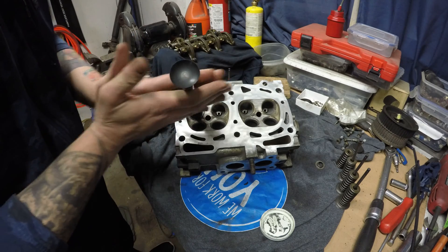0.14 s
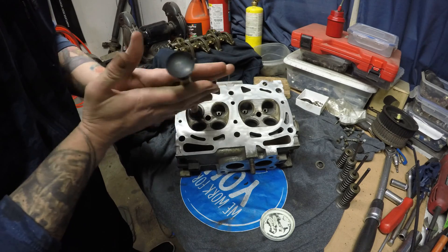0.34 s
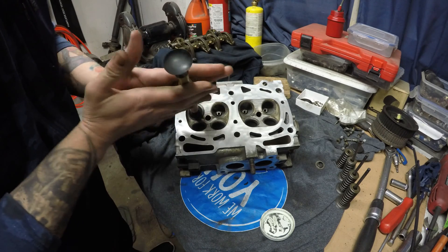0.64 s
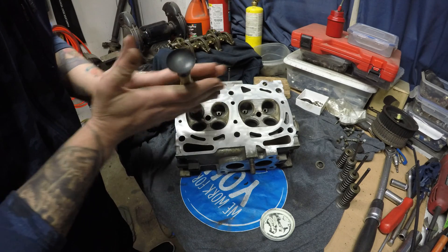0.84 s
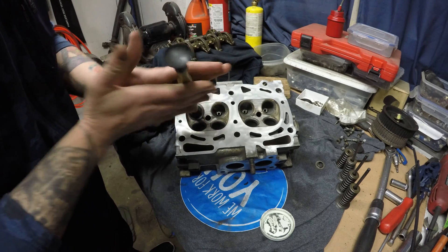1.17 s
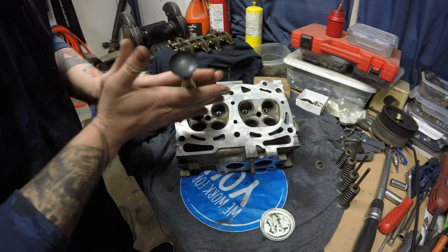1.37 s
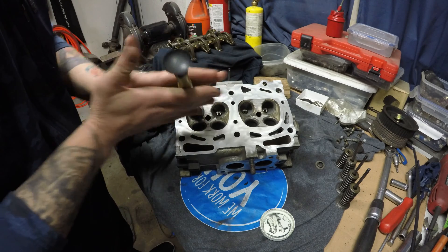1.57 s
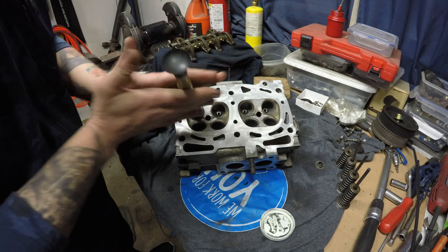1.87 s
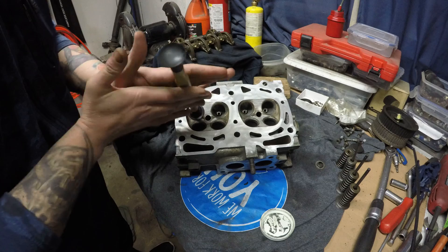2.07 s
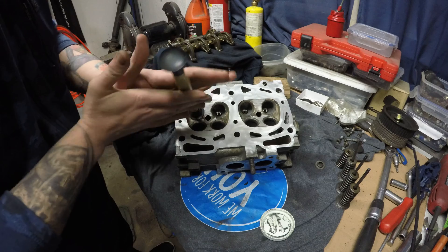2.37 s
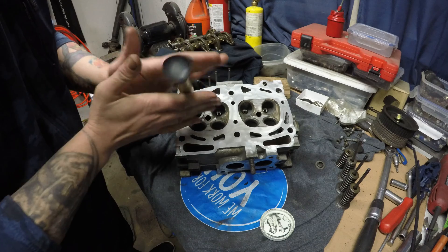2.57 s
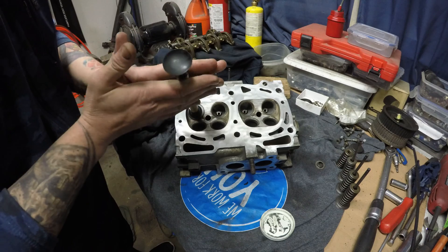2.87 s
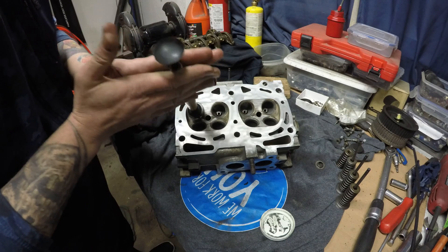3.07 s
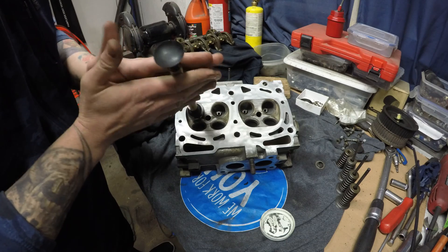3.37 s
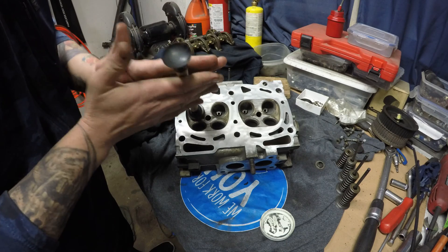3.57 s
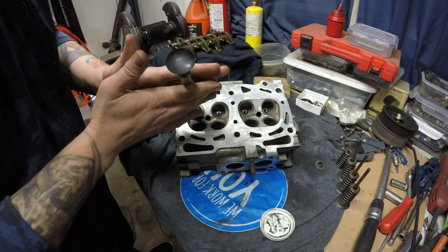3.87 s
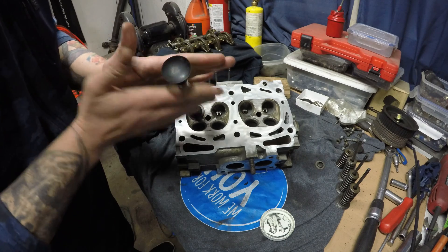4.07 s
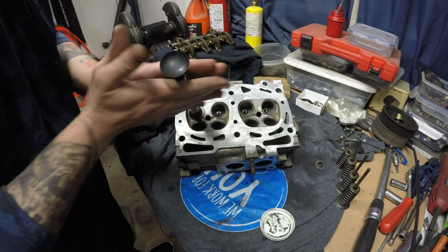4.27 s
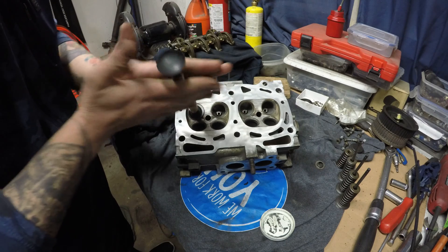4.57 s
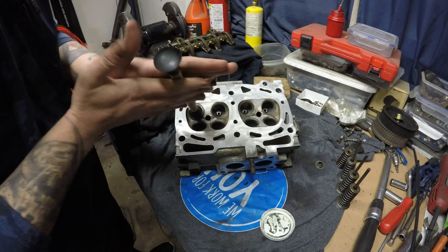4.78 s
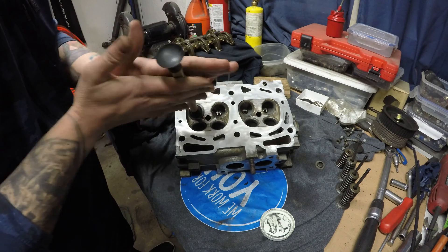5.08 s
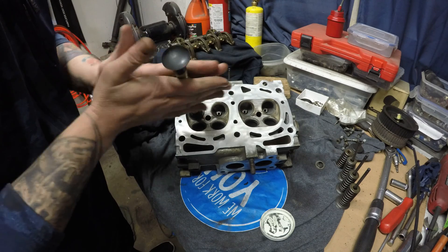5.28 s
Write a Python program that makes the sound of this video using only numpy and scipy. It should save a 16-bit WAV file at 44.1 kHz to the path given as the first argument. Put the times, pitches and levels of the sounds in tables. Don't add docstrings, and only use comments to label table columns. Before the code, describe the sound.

From the start, a steel valve spins to and fro against its seat in an aluminium cylinder head, close to the microphone. Each turn is a short gritty swish of about 0.15 seconds, swelling and fading, nearly seven per second, with a grainy midrange rasp and metallic resonance. The strokes gradually soften, the last weak one ending around 2.55 seconds. A near-silent pause leaves faint low room rumble, distant hum and slight hiss. A very faint stem slide comes at 3.05, then sharp metallic taps at 3.28, 3.53 and 3.78, the third loudest, each a bright clack with a hollow knock near 860 Hz, low bench thump and brief garage reflection. Faint short slides precede the later taps. After another quiet gap, a soft, dull set-down at 4.26 leads straight into a second round of grinding, stronger, slightly slower, with more drumming from the casting, continuing to about 5.5 seconds.

```python
import sys
import numpy as np
from scipy import signal
from scipy.fft import rfft, irfft, next_fast_len
from scipy.io import wavfile
from scipy.ndimage import uniform_filter1d, map_coordinates

SR = 44100
rng = np.random.default_rng(int(sys.argv[2]) if len(sys.argv) > 2 else 0)


def output_pcm(signal):
    pcm = np.clip(np.atleast_2d(signal).T, -1, 1) * 32767
    wavfile.write(sys.argv[1], SR, np.round(pcm).astype(np.int16))


def boost(x):
    u = np.asarray(x, float) / 20
    return 10 ** u


N = 239327
CLOCK = np.arange(N) / SR

# start in seconds, grit level in dB,
# place of top speed from 0 to 1.
TURNS = [
    [(-0.055, -32, 0.72), (0.1383, -32.5, .52), (0.296, -31, 0.45), (0.447, -31.5, 0.49),
     (0.601, -32, 0.44), (0.7367, -30, 0.51), (0.87, -31, 0.52), (1.022, -32.5, 0.51), (1.1747, -33, .37),
     (1.3194, -31.5, 0.4), (1.46, -33.5, 0.44), (1.5983, -32.5, 0.53), (1.747, -34.5, 0.4),
     (1.8986, -33, 0.42), (2.041, -36, 0.4), (2.189, -33, 0.41), (2.336, -36, 0.34), (2.491, -41.5, 0.5)],
    [(4.27, -30, 0.65), (4.4428, -28, 0.52), (4.609, -29.5, 0.53), (4.7629, -29, 0.52), (4.8997, -30, 0.54),
     (5.0488, -31, 0.5), (5.2066, -29.5, 0.52), (5.3712, -30.5, 0.29)],
]
LAST_TURN_S = [0.075, 0.17]
MOVING = [0.93, 0.85]
LONGEST_S = 0.1515
# time in seconds, level in dB.
PRESS = [(0, -42), (.5, -47), (1.2, -48), (1.7, -50.5), (2.5, -52.5), (4.26, -29), (4.7, -34), (5.4, -36)]
FIZZ_DB, FIZZ_PER_PRESS, FIZZ_UNDER_DB = -60, -0.18, 17.5
# start in seconds, grit level in dB, length in seconds,
# fizz over grit in dB.
LIFTS = [
    (3.042, -57.5, 0.16, -9.5),
    (3.237, -54, 0.1, 3),
    (3.49, -56, 0.056, -8),
    (3.743, -57.5, 0.066, 1),
]
LIFT_TOP, LIFT_DRUM_DB = .52, -32
CASTING_HZ = [1310, 2110, 2245, 2375, 2475, 2937, 4145, 4800, 4867, 5203, 5575, 5910, 6095, 6510, 7095,
              7760, 8200, 8527, 8730, 9070, 9268, 9870, 11400, 11620, 12200, 12470, 14500, 15000, 15200]
# width in Hz, level in dB.
RUBBED = [(70, -13), (72.4, -9.5), (35, -3), (40, -11), (60.3, -1), (25.74, 3), (60, -5.5), (36.2, -7.5),
          (40, -16), (46, -3), (60, -11.5), (45, -14), (36, -7.5), (35.8, -7), (23.7, -5), (69, -11.5),
          (35, -12), (39.7, -20), (50, -21), (49, -16.5), (24, -18), (34, -29), (40, -23.5), (30, -22.5),
          (50, -20.5), (30, -26.5), (60, -22), (40, -29.5), (40, -29)]
# frequency in Hz, width in Hz, level in dB.
SEAT = [(2593, 150, -0.5), (3370, 540, -14), (4378, 118, -6.5)]
# frequency in Hz, level in dB per Hz.
PASTE = [(180, -49.5), (300, -37.5), (661, -28.5), (860, -11), (933, -28.5), (1660, -8.5), (2550, -1.5),
         (3720, -13), (5170, -11), (5610, -10), (15300, -41.5)]
# frequency in Hz, width in Hz, level in dB.
VALVE = [(2937, 16, 0), (7095, 16, -9)]
# frequency in Hz, width in Hz, level in dB.
DRUM = [(250, 200, -51.5), (517, 200, -22), (823, 9.7, -19), (859, 26.8, 9), (1037, 18, 0),
        (1099, 72, -8.5), (1478, 85, -9.5), (1800, 89, -10)]
# time in seconds, peak level in dB, drum level in dB,
# brightness in dB, level of the high rings in dB.
TAPS = [
    (3.2796, -4.5, 2.5, -3, -3),
    (3.5266, -5.5, 3.5, -0.5, 1),
    (3.783, -3, 3.5, -1.5, 1.5),
    (4.261, -24, 1.5, -12, -2),
]
# level in dB, t60 in seconds.
STRUCK = [(-17.5, 0.15), (-33, 0.062), (-10.5, 0.11), (-23.5, 0.1), (-25, 0.1), (-11.5, 0.12),
          (-37.5, 0.15), (-26, 0.058), (-7, 0.069), (-11.5, 0.1), (-26.5, 0.051), (-31, 0.093),
          (-18, 0.099), (-13, 0.035), (-20, 0.19), (-22, 0.068), (-28, 0.18), (-31, 0.091), (-28.5, .12),
          (-45, .1), (-38, .1), (-39, .1), (-36.5, .1), (-25.5, .1), (-34, .08), (-23, .09), (-36.5, .07),
          (-35, .07), (-27, 0.058)]
# frequency in Hz, level in dB, t60 in seconds,
# rise in seconds.
THUD = [(40.6, -23.5, 0.29, 0.023), (60.2, -21.5, 0.34, 0.019), (135.8, -12.5, 0.078, 0.0093),
        (400, 1, 0.0082, 0.00056), (848, -6.5, 0.14, 0.00089), (920, -6, 0.021, 0.0022),
        (990, -17, 0.032, 0.0013), (1050, -18, 0.028, .001), (1150, -23.5, 0.03, .001),
        (1449, -14.5, 0.09, 0.0014), (2546, 7, 0.02, 0.00028), (2687, 2.5, 0.018, 0.00038),
        (4310, 6.5, 0.011, 0.00023)]
# start in Hz, sag in Hz per second,
# t60 in seconds, damped after seconds.
TONE = (874, 760, .19, .056)
# frequency in Hz, level in dB per Hz.
CRACK = [(360, -31.5), (620, -19), (739, -14.5), (904, -1.5), (1180, -12.5), (1700, -19.5), (2480, -9.5),
         (3820, -20), (5000, -17.5), (5800, -21), (7290, -28), (9940, -37), (12700, -28.5), (15500, -42)]
# frequency in Hz, t60 in seconds.
RATTLE = [(100, 0.08), (500, 0.13), (900, 0.15), (3000, 0.053), (8000, 0.098), (15000, 0.098)]
ECHO_DB = -21
# frequency in Hz, t60 in seconds.
GARAGE = [(60, 0.45), (300, 0.25), (1000, 0.45), (3000, 0.23), (8000, 0.46), (15000, 0.74)]
# frequency in Hz, level in dB per Hz.
AIR = [(8.8, -45.5), (15, -4), (48, -2), (72, -14.5), (125, -14), (182, -19), (266, -20), (462, -27.5),
       (504, -25), (673, -27), (1070, -32), (4850, -36.5), (15500, -48)]
AIR_DB = -54
# frequency in Hz, level in dB.
AIR_LINES = [(43, -63.5), (85, -64.5)]
# middle in seconds, threshold in dB.
THINNED = [(.158, -7), (.495, -20), (.586, -14), (.862, -26), (1.172, -9.5), (1.24, -11), (1.52, -19),
           (1.572, -22), (1.685, -11), (1.753, -8), (1.96, -12.5), (2.213, -8.5), (2.862, -15.5),
           (2.988, -16.5), (3.213, -20), (3.253, -6.5), (3.858, -16), (3.935, -12.5), (3.976, -15),
           (4.212, -14.5), (4.567, -17), (4.765, -16), (5.303, -9)]
THINNED_S, THINNED_S_PER_DB = .056, .001
TOP_HZ = 15330


def lapping():
    rounds, lifts = strokes()
    turns = rounds + lifts
    return rubbed_casting(turns) + singing_valve(turns, lifts) + rocking_head(turns)


def strokes():
    rounds = []
    for turns, last, moving in zip(TURNS, LAST_TURN_S, MOVING):
        start, grit_db, top = np.transpose(turns)
        press_db = np.interp(start, *np.transpose(PRESS))
        length = np.append(np.minimum(moving * np.diff(start), LONGEST_S), last)
        fizz_db = np.minimum(FIZZ_DB + FIZZ_PER_PRESS * press_db, grit_db - FIZZ_UNDER_DB)
        rounds += zip(start, length, top, grit_db, press_db, fizz_db)
    lifts = [(start, length, LIFT_TOP, db, db + LIFT_DRUM_DB, db + fizz_db)
             for start, db, length, fizz_db in LIFTS]
    return rounds, lifts


def rubbed_casting(turns):
    low = lambda f: 1 / (1 + (f / 8000) ** 6)
    broad = lambda f: boost(along(PASTE, f))
    casting = [(hz, *mode) for hz, mode in zip(CASTING_HZ, RUBBED)]
    modes = resonances(sorted(casting + SEAT))
    body = force(turns, 0.84, "grit", lead=0.015)
    fizz = force(turns, 1.1, "fizz", lead=0.0061)
    out = driven(body * grit(1.1, 0.49), lambda f: broad(f) * low(f), -14.5)
    out += driven(body * grit(0.43, 0.7), lambda f: modes(f) * low(f), -10)
    out += driven(fizz * grit(1.4, 1.6), lambda f: broad(f) * (1 - low(f)), -6)
    out += driven(fizz * grit(1.8, 1.3), lambda f: modes(f) * (1 - low(f)), -3.0)
    return patchy(out, depth_db=1.47)


def singing_valve(turns, lifts):
    push = force(turns, .4, "grit", lead=0.0054)
    push += boost(12.5) * force(lifts, 1.1, "grit", lead=.004)
    return driven(push * grit(1.0, 1.1), resonances(VALVE), -22.5)


def rocking_head(turns):
    push = force(turns, 0.19, "drum", lead=0.012)
    return driven(push * grit(2.93, 2.03), resonances(DRUM), -3.5)


def force(rows, sharp, layer, lead):
    out = np.zeros(N)
    column = ("grit", "drum", "fizz").index(layer)
    for start, length, top, *levels in rows:
        u = np.clip((CLOCK - start + lead) / length, 0, 1)
        u = u ** (np.log(.5) / np.log(np.clip(top, .15, .85)))
        out += boost(levels[column]) * np.abs(np.sin(np.pi * u)) ** sharp
    return out


def grit(spiky_db, clump_db):
    grains = np.repeat(rng.exponential(size=N // 12 + 1), 12)[:N]
    clumps = map_coordinates(rng.standard_normal(N // 150 + 4), [np.arange(N) / 150])
    return unit(rng.standard_normal(N) * boost(spiky_db * grains + clump_db * clumps))


def patchy(x, depth_db):
    z = signal.stft(x, nperseg=512)[2]
    field = uniform_filter1d(rng.standard_normal(z.shape), size=5, axis=0)
    field = uniform_filter1d(field, size=8, axis=1)
    return signal.istft(z * boost(depth_db * unit(field)), nperseg=512)[1][:N]


def driven(push, response, db):
    gain = np.sqrt(np.mean(np.abs(response(np.linspace(1, SR / 2, 20000))) ** 2))
    return boost(db) * filtered(push, response) / gain


def resonances(peaks):
    def response(f):
        return sum((-1) ** k * boost(db) * 1j * f * width / (hz * hz - f * f + 1j * f * width)
                   for k, (hz, width, db) in enumerate(peaks))
    return response


def filtered(x, response):
    m = next_fast_len(len(x) + SR // 2)
    return irfft(rfft(x, m) * response(np.fft.rfftfreq(m, 1 / SR)), m)[:len(x)]


def along(points, hz):
    f, v = np.transpose(points)
    return np.interp(np.log(hz + 1), np.log(f + 1), v)


def unit(x):
    return x / np.sqrt(np.mean(x ** 2) + 1e-20)


def taps():
    out, t = np.zeros(N + SR), np.arange(SR // 2) / SR
    drum = bench_drum(t)
    seat = sum(ring(t, *mode) for mode in THUD if mode[0] > 1500)
    echo = np.sin(2 * np.pi * 862 * t) * np.exp(-((t - .096) / .0105) ** 4)
    for s, db, drum_db, bright_db, high_db in TAPS:
        metal = struck_casting(t, high_db)
        crack = dying(CRACK, lambda hz: along(RATTLE, hz), size=SR // 2)[:len(t)]
        bright = seat + metal + boost(24.0) * crack
        blow = boost(drum_db) * drum + boost(bright_db) * bright + boost(ECHO_DB) * echo
        out[round(s * SR):][:len(t)] += boost(db - 9.5) * blow
    return out[:N]


def bench_drum(t):
    start_hz, sag, fade, damped = TONE
    drum = boost(-1.0 - 60 * t / fade) * np.sin(2 * np.pi * (start_hz - sag * t / 2) * t)
    drum *= 1 - np.exp(-t / 0.0032)
    drum *= 1 / (1 + np.exp((t - damped) / .004))
    drum += sum(ring(t, *mode) for mode in THUD[1:] if mode[0] < 1500)
    return drum - ring(t, *THUD[0])


def struck_casting(t, high_db):
    metal = np.zeros(len(t))
    for hz, (db, t60) in zip(CASTING_HZ, STRUCK):
        metal += ring(t, hz, db + high_db * (hz > 6000) + rng.normal(0, 1.1), t60, 0.001)
    return metal


def ring(t, hz, db, t60, rise):
    return boost(db - 60 * t / t60) * np.sin(2 * np.pi * hz * t) * (1 - np.exp(-t / rise))


def dying(spectrum, t60, size):
    hz, t, z = signal.stft(rng.standard_normal(size), SR, nperseg=128)
    tail = signal.istft(z * boost(-60 * t / t60(hz)[:, None]), SR, nperseg=128)[1]
    tail = filtered(tail, lambda f: boost(along(spectrum, f)))
    return tail / np.linalg.norm(tail)


def garage(x):
    colour = [(20, 7), (400, -6.5), (860, -12), (2000, 0.0), (16000, -14.5)]  # (Hz, dB)
    tail = dying(colour, lambda hz: along(GARAGE, hz), size=SR // 2)
    return signal.fftconvolve(np.pad(x, (400, 0)), tail)[:N]


def air():
    out = boost(AIR_DB) * unit(filtered(rng.standard_normal(N), lambda f: boost(along(AIR, f))))
    for hz, db in AIR_LINES:
        out += boost(db) * unit(filtered(rng.standard_normal(N), resonances([(hz, 8, 0)])))
    return out


def scene():
    rub, knocks = lapping(), taps()
    echo = garage(boost(-15.5) * rub + boost(-18.0) * knocks)
    return (rub + knocks + echo + air())[None]


def thinned(x):
    x = np.pad(x, (0, SR))
    for s, threshold_db in THINNED:
        size = round((THINNED_S + THINNED_S_PER_DB * threshold_db) * SR)
        first = round(s * SR) - size // 2
        part = slice(first, first + size)
        window = np.sqrt(signal.windows.tukey(size, .6))
        z = rfft(window * x[part])
        level = 20 * np.log10(np.abs(z) / np.abs(z).max() + 1e-9)
        lost = level < threshold_db + .5 * uniform_filter1d(level, 40)
        x[part] -= window * irfft(z * lost, size)
    return x[:N]


def roll_off(x):
    return signal.sosfilt(signal.butter(12, 16270, fs=SR, output="sos"), x)


def record(dry):
    leak = lambda hz: boost(-29.5 - .02 * (hz - TOP_HZ))
    heard = filtered(dry[0], lambda hz: np.where(hz < TOP_HZ, 1, leak(hz)))
    mix = thinned(heard)[None]
    return roll_off(mix)


dry = scene()
out = record(dry)
output_pcm(out)
```